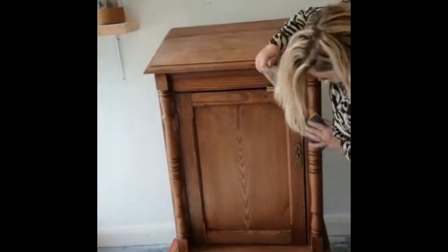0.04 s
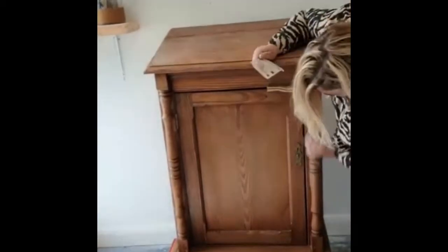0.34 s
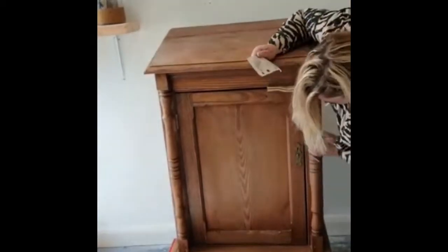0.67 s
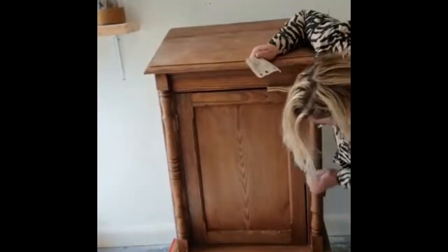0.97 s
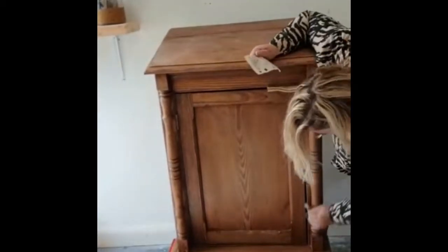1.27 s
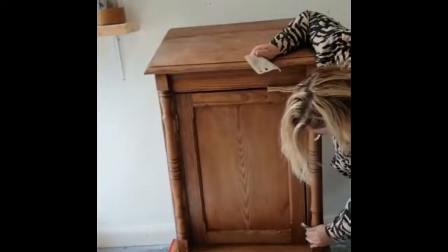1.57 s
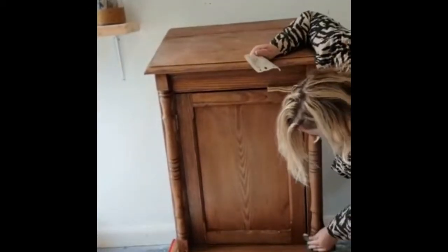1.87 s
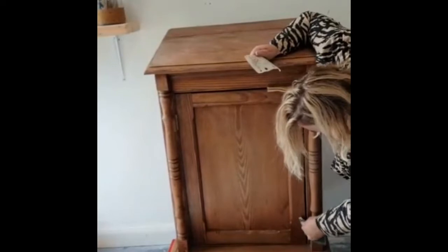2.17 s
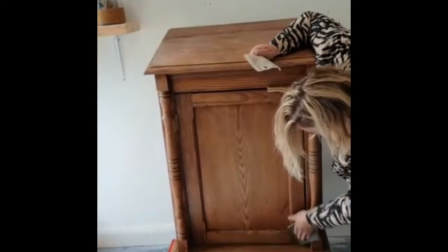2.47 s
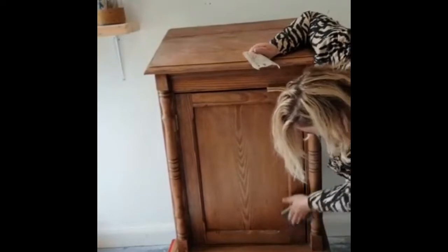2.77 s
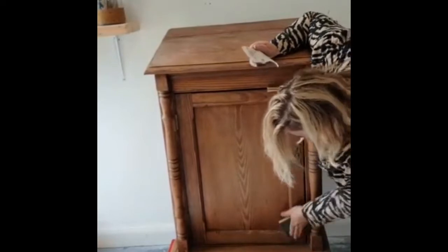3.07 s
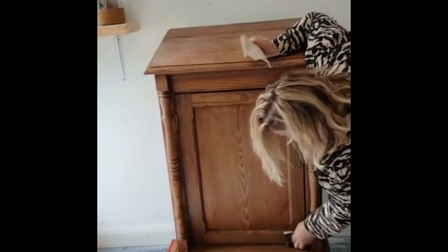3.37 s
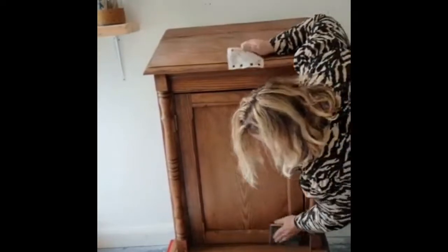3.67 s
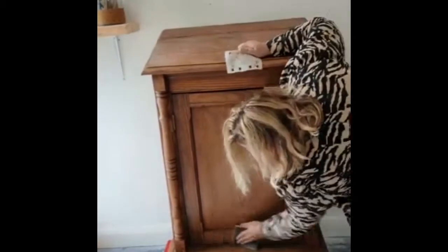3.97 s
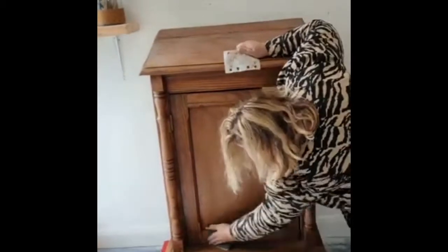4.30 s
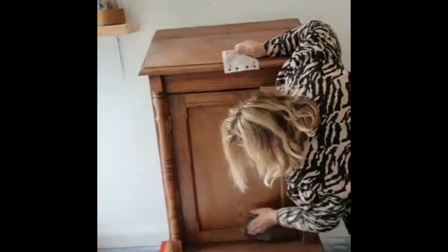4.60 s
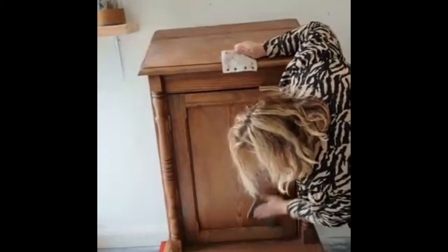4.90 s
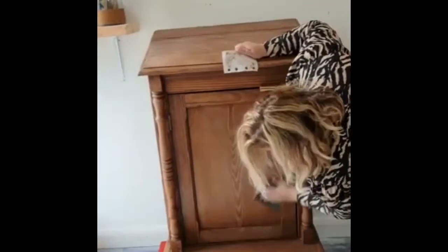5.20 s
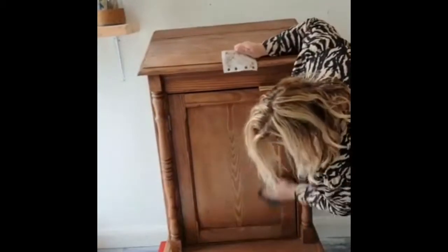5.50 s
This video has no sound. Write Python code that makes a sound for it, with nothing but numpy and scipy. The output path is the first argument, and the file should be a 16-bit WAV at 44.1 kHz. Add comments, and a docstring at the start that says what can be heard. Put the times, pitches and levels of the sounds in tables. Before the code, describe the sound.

A sanding sponge rubs quickly back and forth on a wooden cabinet, making a bright, gritty hiss over a faint hollow murmur. The strokes weaken, then the door is bumped with a deep, shuddering boom. Sanding resumes with short rasps, pauses briefly, and a second boom follows. Slower, more even strokes finish. The stereo microphone is close, in a slightly reverberant workshop with a low steady background noise.

```python
"""A workshop, with a stereo microphone near a wooden cabinet whose turned post and door are being sanded.
The sponge goes back and forth; its grit scratches the wood with a bright hiss and its drag makes the
hollow case murmur. Where it catches, the wood judders or rasps; twice the door is bumped hard and booms.
Behind the work are the room's reverberation and its low steady noise."""
import sys
import numpy as np
from scipy import signal
from scipy.fft import rfft, irfft
from scipy.io import wavfile
from scipy.ndimage import uniform_filter1d

SR = 44100
rng = np.random.default_rng(int(sys.argv[2]) if len(sys.argv) > 2 else 0)


def master_out(mix):
    """Clip the mix to full scale and print it as 16-bit PCM to the path in sys.argv[1]."""
    frames = np.transpose(np.atleast_2d(mix))
    ceiling = np.clip(frames, -1, 1)
    pcm = np.round(ceiling * 32767).astype(np.int16)
    wavfile.write(sys.argv[1], SR, pcm)


N = 249165
TIME = np.arange(N) / SR
FREQ_HZ = np.fft.rfftfreq(N, 1 / SR)


# strokes down the post, along the bottom rail, then over the door: start_s, length_s, level_db, coarse_db (a
# high coarse_db makes a stroke scrape low, a low one makes it fizz)
STROKES = [(-0.046, 0.18, -42, 3.8), (0.038, 0.11, -34.5, -4.5), (0.17, 0.11, -23.5, -4.5),
           (0.286, 0.14, -25, 2.5), (0.446, 0.112, -24, 0), (0.573, 0.124, -26.5, 1.8),
           (0.709, 0.16, -26, 1), (0.908, 0.12, -29.5, 4), (1.064, 0.154, -28, -0.7),
           (1.267, 0.09, -31.5, 6), (1.406, 0.092, -31, 3), (1.5, 0.25, -51.5, 18),
           (1.827, 0.065, -46.5, 12), (1.911, 0.12, -41, 9), (2.122, 0.15, -41, 9.5),
           (2.205, 0.13, -30.5, 5.5), (2.474, 0.056, -38.5, 6), (2.526, 0.083, -34, 8.5),
           (2.629, 0.11, -27.5, -0.5), (2.778, 0.13, -28.5, 2.5), (2.889, 0.12, -27.5, 2),
           (3.0, 0.23, -38.5, 13), (3.381, 0.17, -51, 14), (3.528, 0.084, -43.5, 8.5),
           (3.671, 0.11, -28.5, 2), (3.709, 0.21, -29.5, -3), (3.949, 0.19, -28.5, -0.5),
           (4.135, 0.18, -28, 0), (4.367, 0.22, -28, -1), (4.568, 0.22, -30, 0),
           (4.674, 0.25, -30.5, -15.5), (4.821, 0.23, -28.5, -5), (4.977, 0.26, -30.7, -3.5),
           (5.159, 0.16, -29.5, -6), (5.298, 0.19, -30, -6.5), (5.47, 0.17, -28, -3.5)]
# grit on wood at each side of the microphone: freq_hz, left_db, right_db
GRIT_SPECTRUM = [(690, -9.5, -8), (1030, -14.5, -10.5), (1700, -10.5, -6.5), (2760, -7, -5.5),
                 (3350, -7, -1.84), (4860, -4, -0.8), (5700, -8.5, 1.3), (6120, -6.5, -2),
                 (7400, -3.5, 2.5), (8170, -3.5, -0.8), (9030, -3.5, -6.5), (12500, -2, -0.4),
                 (14100, -3, -4.5), (14800, -9, -5.5)]
# resonances of the post that colour the hiss: pitch_hz, width_hz, boost_db
POST_RESONANCES = [(1690, 170, 2), (2440, 560, 2.5), (3340, 89, 2.5)]
# the hiss grows as a power of speed, the treble fastest: freq_hz, exponent
SPEED_LAW = [(1500, 0.29), (3500, 0.63), (7000, 0.8), (12000, 0.98)]
# tilt of the hiss for one dB of coarseness: freq_hz, gain_db
COARSE_TILT = [(800, 1.0), (1500, 1.02), (2200, 0.75), (3500, 0.43), (7000, -0.12), (12000, -0.31)]

def sanding(level_db=-1, patchy_db=1.5, wet_db=3):
    """Each stroke's speed sets the level and fizz of the scratching, which lingers in the room."""
    grains = scratches(per_s=2600, spread_db=0.7, bed_db=6, flutter_db=0.4, flutter_hz=70)
    hz, t, spectra = signal.stft(reflections(grains, echo_db=-10, reach_s=0.03), SR, nperseg=512)
    post_db = sum(db / (1 + (2 * (hz - f) / width) ** 2) for f, width, db in POST_RESONANCES)
    grit = np.array([amp(read(np.array(GRIT_SPECTRUM)[:, [0, side]], hz) + post_db) for side in (1, 2)])
    grit /= np.sqrt(1 + (450 / (hz + 1)) ** 4)  # low cut at 450 Hz
    exponent, tilt, t60 = (read(table, hz)[:, None] for table in (SPEED_LAW, COARSE_TILT, ROOM_DECAY))
    power = np.zeros(spectra.shape[1:])
    for start, length, db, coarse_db in STROKES:
        during = np.abs(t - start - length / 2) < length
        power[:, during] += (amp(db + coarse_db * tilt) * speed(t[during], start, length) ** exponent) ** 2
    tail = amp(-60 * t[:200] / t60) ** 2
    lingering = signal.fftconvolve(power, tail / tail.sum(1, keepdims=True), axes=1)[:, :len(t)]
    power += amp(wet_db) ** 2 * np.abs(lingering)
    # the patch of wood under the sponge keeps changing, and the colour with it
    patches = uniform_filter1d(rng.standard_normal(spectra.shape), size=5, axis=1)
    patches = unit(uniform_filter1d(patches, size=12, axis=2))
    spectra *= unit(grit)[:, :, None] * np.sqrt(power) * amp(level_db + patchy_db * patches)
    return signal.istft(spectra, SR, nperseg=512)[1][:, :N]


def scratches(per_s, spread_db, bed_db, flutter_db, flutter_hz):
    """Grains snag and snap over a bed of countless finer ones; the grip flutters."""
    size = amp(spread_db * np.minimum(rng.exponential(1, (2, N)), 3)) * rng.choice([-1, 1], (2, N))
    snaps = unit(size * (rng.random((2, N)) < per_s / SR))
    bed = amp(bed_db) * rng.standard_normal((2, N))
    return unit((snaps + bed) * amp(flutter_db * wobble(flutter_hz)))


def speed(t, start, length, peak_at=0.45, half_width=0.4, squareness=2.84):
    """The hand eases in and out of a stroke: a bell, 1 at the fastest."""
    along = (t - start) / length
    return np.exp(-np.abs((along - peak_at) / half_width) ** squareness)


# the wood catches; the hard bumps fall near 2.2 s and 3.5 s: start_s, level_db, length_s, slip_rate_hz
JUDDERS = [ (0.235, -39, 0.04, 280.4), (0.245, -42, 0.053, 356), (0.332, -35.5, 0.046, 148.6),
           (0.44, -40, .13, 153.7), (0.6, -38, .12, 162.9), (0.784, -36.5, 0.073, 171.2),
           (1.175, -40.5, 0.051, 126), (1.299, -36, 0.069, 130.9), (1.37, -40, 0.15, 81.9),
           (1.999, -40.5, 0.069, 419.4), (2.185, -21, 0.078, 82), (2.2, -32, 0.13, 207),
           (2.385, -41, 0.063, 79.5), (2.525, -32.5, .12, 87.7), (2.966, -43, 0.15, 93.6),
           (3.532, -21.5, 0.14, 82.6), (3.54, -29, 0.11, 206.2), (3.544, -31, 0.1, 379.2),
           (3.723, -42, 0.16, 266), (4.146, -41.5, 0.065, 213), (4.384, -33.5, 0.11, 85.8),
           (4.708, -40, 0.06, 90.2), (5.427, -43, 0.075, 88.2), (5.581, -44, 0.046, 92)]
# the loose door's shudder: freq_hz, level_db
SHUDDER_SPECTRUM = [(30, -13), (55, -5), (82, 11), (112, -12), (150, -7), (178, 3), (193, 2), (207, 1.5),
                    (228, -4), (268, -2.5), (350, -1), (450, -14.5), (560, -7.5), (750, -40), (1200, -25),
                    (4000, -55)]

def bumps(shudder_db=-12, wet_db=1, follow_s=0.0064, light_share=0.6, ring_wet_db=-10):
    """Every judder booms in the case and shakes the door, whose shudder fills the room."""
    ring, shaking = np.zeros((2, N))
    for start, db, length, rate_hz in JUDDERS:
        hard = np.clip((db + 36) / 14, 0, 1)
        # hard judders slip more evenly, light ones stumble
        sound = amp(db) * judder(length, rate_hz, jitter=np.interp(hard, [0, 1], [0.11, 0.06]))
        add(ring, start, sound)
        add(shaking, start, sound * (light_share + (1 - light_share) * hard))
    pole = np.exp(-1 / (follow_s * SR))
    swing = np.sqrt(signal.lfilter([1 - pole], [1, -pole], shaking ** 2))
    shudder = swing * unit(colour(pair(rng.standard_normal((2, N))), SHUDDER_SPECTRUM))
    shudder_echo = room(shudder[0], wet_db) - shudder[0]
    # the deep boom reaches the microphone directly, the upper ring also by way of the room
    boom = colour(ring, [(90, 2), (200, 0), (400, -7), (900, 1.5)])
    ring_echo = colour(room(ring, ring_wet_db) - ring, [(85, -0.5), (160, 5.5), (400, 6)])
    return boom + ring_echo + amp(shudder_db) * (shudder + shudder_echo)


def judder(length, rate_hz, jitter, contact_s=0.0004, count=40):
    """A burst of soft slips that swells and lets go; the cabinet rings on."""
    t = TIME[:1024]
    slip_s = (np.arange(count) + jitter * rng.standard_normal(2 * count)[::2]) / rate_hz
    along = np.clip(slip_s / length, 0, 1)
    strength = 1 - along + np.sin(np.pi * along)
    slips = np.bincount((np.abs(slip_s) * SR).astype(int), strength, SR)
    force = np.convolve(slips, t * np.exp(-t / contact_s))[:SR]
    sound = signal.fftconvolve(force, cabinet())[:SR]
    # quick slips hardly move the slower modes
    sound = signal.sosfilt(signal.butter(2, rate_hz / 2, "highpass", fs=SR, output="sos"), sound)
    return sound / np.sqrt(np.mean(sound[:SR // 10] ** 2))


# modes of the hollow case: pitch_hz, level_db, t60_s
CABINET_MODES = [(60, -15, 0.77), (80.5, -6, 0.65), (100.4, -1, 0.51), (127.2, 5.5, 0.15),
                 (154.5, -0.5, 0.37), (178.5, -3, 0.31), (204.9, -1, 0.18), (255, 1, 0.083),
                 (266.2, -9, 0.94), (289, -17.5, 0.2), (324.5, -9.5, 0.41), (339, -1.5, 0.1),
                 (413.4, 0.5, 0.099), (526, -35, 0.27), (590.5, -16, 0.19), (640, -26, 0.18)]

def cabinet(thud_gain=10 * 10 ** (-3 / 20), thud_s=0.002):
    """The case's answer to one push: a short thud and its ringing modes."""
    t = TIME[:SR]
    ring = sum(amp(db - 60 * t / t60) * np.sin(2 * np.pi * hz * t) for hz, db, t60 in CABINET_MODES)
    return ring + thud_gain * (1 - t / thud_s) * np.exp(-t / thud_s)


# how hard the drag shakes the panels, most along the post: time_s, level_db
DRAG_LEVEL = [(0, -45.5), (0.18, -51.5), (0.25, -47.5), (0.85, -44), (1.25, -39.5), (1.55, -38), (1.8, -44),
              (2.05, -39), (3.1, -45), (3.38, -49.5), (3.9, -53), (4.35, -55), (5.65, -54.5)]
# hollow tones of the rubbed panels: pitch_hz, half_width_hz, level_db
PANEL_TONES = [(288, 20, 5), (348.3, 9.3, 4.5), (382.7, 14.5, -1), (441.4, 28, 4.5), (470, 34, -36),
               (495, 16, 5), (560, 20, -0.5), (735, 74, -9), (810, 55, -7.5)]
# the drag's push on the case: freq_hz, gain_db
PUSH_SPECTRUM = [(56, 7), (81, -11), (104, 4.5), (130, 4), (175, 7), (210, 0.5), (270, 6), (450, -1)]

def murmur(level_db=-1, case_db=-47, stroke_follow=0.067, drag_follow=0.098, lumpy_db=2):
    """The uneven drag shakes the panels; every stroke also pushes the heavier case, which hums on."""
    force = pair(rng.standard_normal((2, N))) * amp(lumpy_db * wobble(rate_hz=6.7))
    drag_db = np.interp(TIME, *np.transpose(DRAG_LEVEL))
    tone_power = sum((amp(db) / (1 + ((FREQ_HZ - f) / width) ** 2)) ** 2 for f, width, db in PANEL_TONES)
    panels = unit(irfft(rfft(force) * np.sqrt(tone_power), N))
    t = TIME[::256]
    effort = sum(amp(stroke_follow * db) * speed(t, start, length) for start, length, db, _ in STROKES)
    push = force * np.interp(TIME, t, effort) * amp(drag_follow * drag_db)
    case = unit(colour(signal.oaconvolve(push, cabinet()[None], axes=1)[:, :N], PUSH_SPECTRUM))
    return panels * amp(level_db + drag_db) + case * amp(case_db)


# nasal rasps, a little to the microphone's right: start_s, level_db, length_s
RASPS = [(0.212, -39, 0.04), (0.326, -44, 0.068), (2.133, -39, 0.13), (2.199, -35.5, 0.13),
         (2.497, -37, 0.035), (2.922, -33.5, 0.081)]

def rasps(centre_hz=1850, half_width_hz=750):
    """The sponge's edge catches, and a short run of coarse snaps rings the edge of the door."""
    snaps = scratches(per_s=1400, spread_db=2.5, bed_db=1, flutter_db=1.5, flutter_hz=90)
    edge = unit(irfft(rfft(snaps) / (1 + ((FREQ_HZ - centre_hz) / half_width_hz) ** 4), N))
    grip = sum(amp(db) * np.sin(np.pi * np.clip((TIME - s) / length, 0, 1)) for s, db, length in RASPS)
    return edge * grip * amp([[-1.5], [1.5]])


# the sponge is set down on the wood: start_s, level_db
LANDINGS = [(1.834, -48), (1.92, -45), (2.479, -33), (3.541, -39)]

def ticks(decay_s=0.003):
    """Grit cracks briefly as the sponge lands."""
    cracks, t = np.zeros(N), TIME[:2048]
    for start, db in LANDINGS:
        add(cracks, start, amp(db) * rng.standard_normal(len(t)) * np.exp(-t / decay_s))
    return room(colour(cracks, [(300, 0), (2000, 2), (7000, 1), (15000, -4)]), wet_db=-6)


def reflections(x, echo_db, reach_s, count=24):
    """Door, floor and wall throw early echoes, different for each side, that comb the hiss."""
    taps = np.zeros((2, SR // 10))
    for side in taps:
        delay_s = reach_s * rng.uniform(0.08, 1, count)
        side[(delay_s * SR).astype(int)] = amp(echo_db) * rng.choice([-1, 1], count) / np.sqrt(count)
    taps[:, 0] = 1
    return unit(signal.oaconvolve(x, taps, axes=1)[:, :N])


# the workshop's reverberation: freq_hz, t60_s
ROOM_DECAY = [(60, 1), (250, 0.78), (1000, 1), (3500, 0.88), (7000, 0.81), (13000, 0.58)]

def room(x, wet_db, build_s=0.0022):
    """The direct sound plus a diffuse tail in which each band dies at its own speed."""
    hz, t, spectra = signal.stft(rng.standard_normal((2, SR)), SR, nperseg=512)
    decay = amp(-60 * t / read(ROOM_DECAY, hz)[:, None])
    tail = signal.istft(spectra * decay, SR, nperseg=512)[1][:, :SR]
    tail = pair(tail) * (1 - np.exp(-TIME[:SR] / build_s))
    return x + amp(wet_db) * signal.fftconvolve(x[None], tail / np.linalg.norm(tail[0]), axes=1)[:, :N]


# room tone all around the microphone: freq_hz, level_db
ROOM_TONE = [(20, -36), (40, -18), (49, -22), (57, 1), (68, 1), (130, -6.5), (170, -9.5), (230, -1.5),
             (600, -25), (2000, -6), (6000, -21), (15000, -51)]

def room_tone(level_db=-53):
    """The low steady noise of the room, strongest at its deepest resonance."""
    return amp(level_db) * unit(colour(pair(rng.standard_normal((2, N))), ROOM_TONE))


# likeness of the microphone's two sides: freq_hz, correlation
STEREO_LIKENESS = [(60, 0.93), (130, 0.96), (290, 0.76), (640, 0.78), (1400, 0.39), (15000, 0.37)]

def pair(x):
    """Two unrelated signals become a left and a right that share their bass."""
    a, b = rfft(x)
    likeness = read(STEREO_LIKENESS, np.fft.rfftfreq(x.shape[-1], 1 / SR))
    mid, side = a * np.sqrt((1 + likeness) / 2), b * np.sqrt((1 - likeness) / 2)
    return irfft(np.array([mid + side, mid - side]), x.shape[-1])


def amp(db):
    """Decibels to gain."""
    return 10 ** (np.asarray(db) / 20)


def unit(x):
    """Scales to rms 1."""
    return x / np.sqrt(np.mean(x ** 2) + 1e-20)


def read(points, hz):
    """Reads a table on a log-frequency axis."""
    f, value = np.transpose(points)
    return np.interp(np.log(hz + 1), np.log(f + 1), value)


def colour(x, points):
    """Filters by a curve of freq_hz, gain_db points."""
    return irfft(rfft(x) * amp(read(points, np.fft.rfftfreq(x.shape[-1], 1 / SR))), x.shape[-1])


def wobble(rate_hz):
    """Random drift of rms 1, mostly slower than rate_hz."""
    return unit(irfft(rfft(rng.standard_normal(N)) / (1 + (FREQ_HZ / rate_hz) ** 2), N))


def add(mix, start_s, sound):
    """Mixes a sound in at start_s."""
    part = mix[max(round(start_s * SR), 0):][:len(sound)]
    part += sound[:len(part)]


def scene():
    """Hiss, wood and room as they meet at the microphone."""
    return sanding() + rasps() + murmur() + bumps() + ticks() + room_tone()


def record(dry):
    """The microphone loses the bass below 46 Hz and the treble above 15560 Hz."""
    thin = signal.sosfilt(signal.butter(4, 46, "highpass", fs=SR, output="sos"), dry)
    lowpass = signal.firwin(767, 15560, window=("kaiser", 9), fs=SR)
    return signal.oaconvolve(thin, lowpass[None], "same")


dry = scene()
out = record(dry)
master_out(out)
```